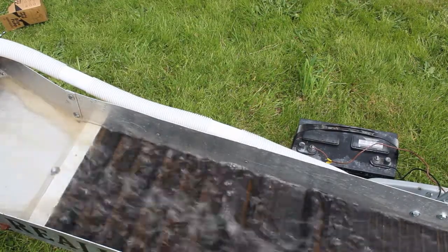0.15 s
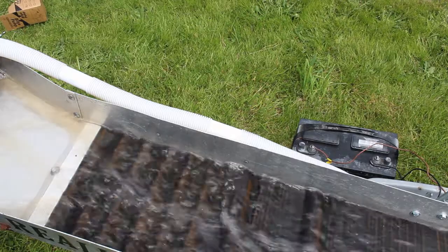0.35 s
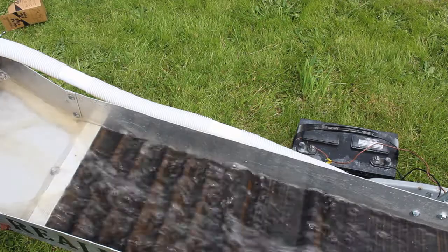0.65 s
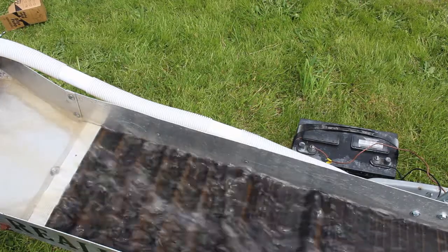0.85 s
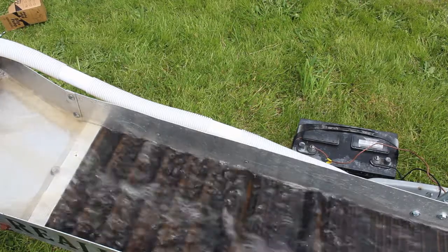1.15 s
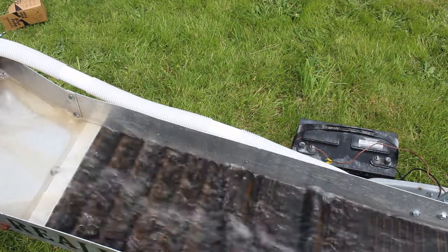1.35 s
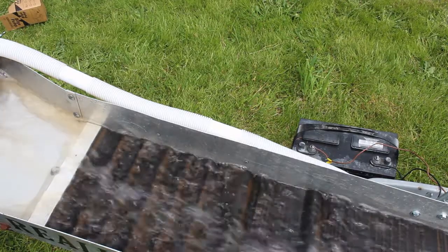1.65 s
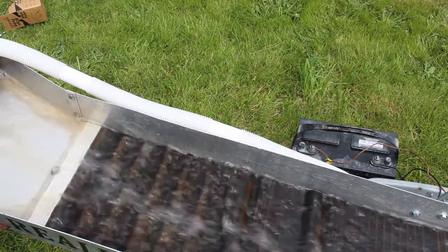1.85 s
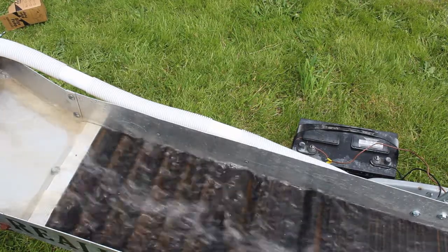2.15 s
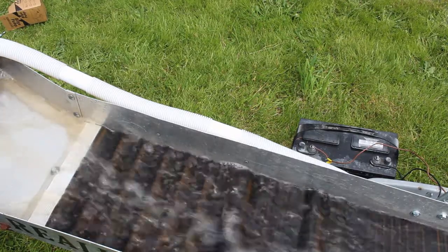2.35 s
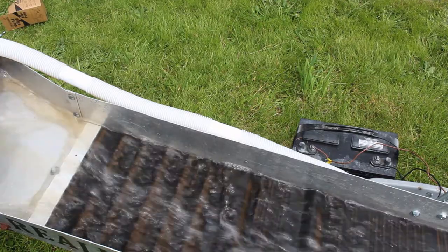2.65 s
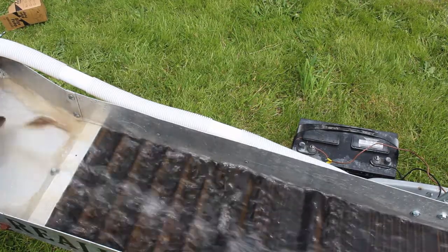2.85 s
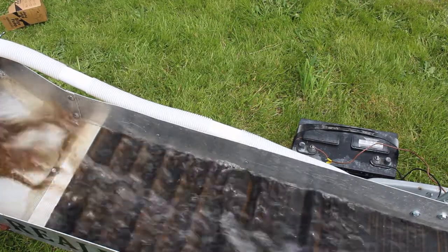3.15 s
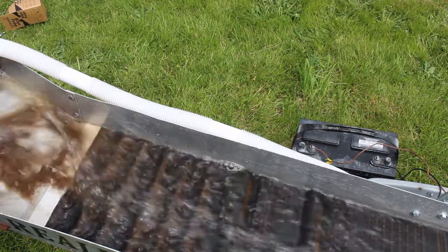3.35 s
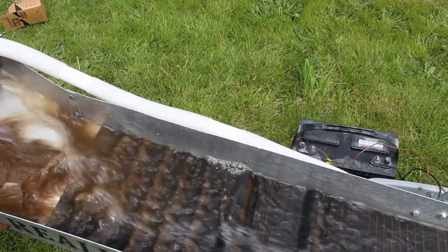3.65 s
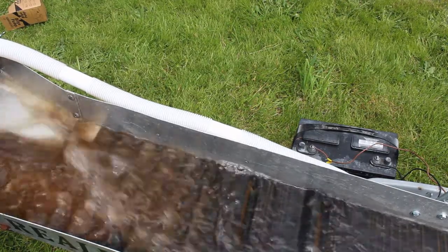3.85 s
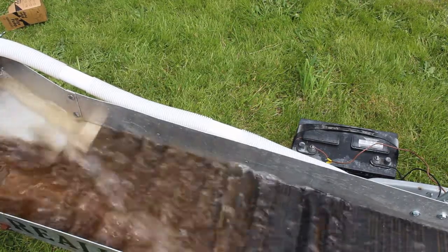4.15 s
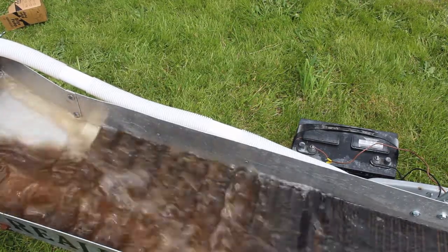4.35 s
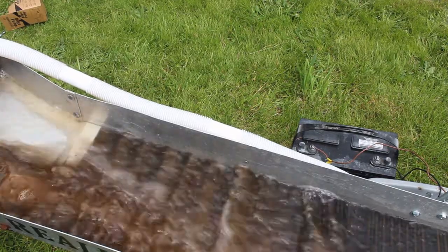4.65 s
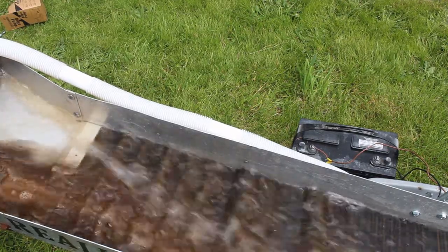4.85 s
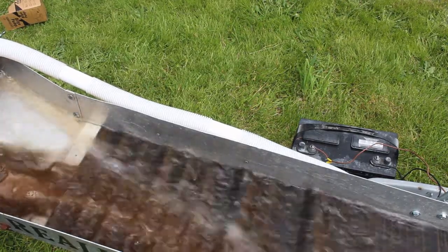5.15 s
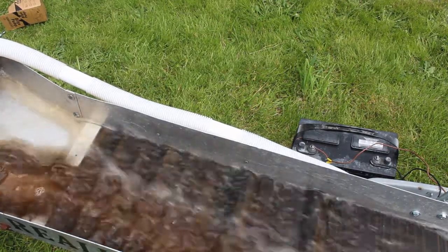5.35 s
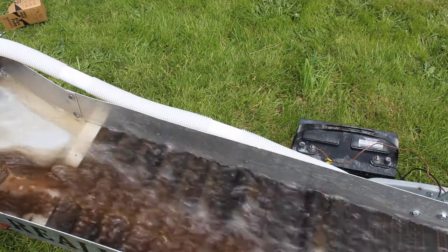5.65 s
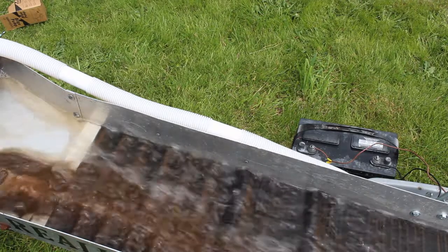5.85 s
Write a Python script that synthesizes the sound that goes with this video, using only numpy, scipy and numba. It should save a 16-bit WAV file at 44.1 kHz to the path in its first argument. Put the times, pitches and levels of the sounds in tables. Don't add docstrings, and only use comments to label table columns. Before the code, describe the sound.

Pumped water tumbles over riffles in a metal sluice box on a lawn, close to a small microphone. Bubbles gurgle, plop and fizz continuously. Faint gravelly shovel scrapes come in the first second; around three seconds dirt thuds onto the sheet metal with a gritty click, followed by a softer slump. Low engine hum lies underneath.

```python
import sys
import numpy as np
from scipy import signal
from scipy.fft import rfft, irfft
from scipy.io import wavfile
from scipy.ndimage import uniform_filter1d
from numba import njit

SR = 44100
rng = np.random.default_rng(int(sys.argv[2]) if len(sys.argv) > 2 else 0)


def materialize(psi):
    bounded = np.clip(np.atleast_2d(psi).T, -1, 1)
    quanta = np.round(bounded * 32767).astype(np.int16)
    wavfile.write(sys.argv[1], SR, quanta)


def magnitude_from_level(level_db):
    exponent = np.asarray(level_db, float) / 20
    return 10 ** exponent


N = 264600
TIME = np.arange(N) / SR

# time in seconds, fizz level in dB.
WATER_FLOW = [(0.0, -26.5), (0.1, -31), (0.22, -25.5), (0.7, -27.5), (1.04, -25), (1.2, -28.5),
              (2.1, -28.5), (2.2, -30.5), (2.4, -28.5), (2.97, -29.5), (3.06, -33.5), (3.18, -32.5),
              (3.3, -30), (3.75, -30), (4.9, -29), (5.3, -30), (5.5, -28.5), (6.0, -29)]
# start in seconds, length in seconds, level in dB, pitch in Hz.
AIR_SURGES = [(0.102, .066, -25, 926), (0.262, 0.105, -22.5, 1040), (0.407, 0.034, -19.5, 1170),
              (0.5, 0.094, -21, 1030), (0.628, 0.36, -20.5, 1003), (1.0, .13, -20, 1354),
              (1.331, 0.038, -21.5, 900), (1.454, 0.08, -21.5, 1144), (1.58, 0.1, -23.5, 955),
              (1.804, 0.046, -19, 1090), (1.892, 0.083, -24.5, 864), (2.121, 0.14, -22.5, 1020),
              (2.335, 0.034, -16.5, 1010), (2.487, 0.049, -18.5, 1070), (2.596, .04, -24, 1160),
              (2.711, 0.12, -24, 1140), (2.889, .03, -23.5, 990), (3.078, 0.067, -23.5, 894),
              (3.324, 0.14, -23, 1040), (3.638, 0.32, -22, 1104), (4.037, 0.21, -24.5, 1040),
              (4.325, 0.069, -24, 1078), (4.569, .06, -23.5, 1000), (4.76, 0.021, -19, 930),
              (4.84, 0.058, -25, 1010), (5.078, 0.2, -24, 950), (5.51, 0.036, -26, 1260),
              (5.632, 0.043, -19.5, 1140), (5.717, 0.043, -25, 900)]
# time in seconds, peak in dB, pitch in Hz.
LARGE_POCKETS = [(.152, -18, 834), (.3, -7.5, 1070), (.679, -4.5, 1056), (.715, -17, 1290),
                 (.769, -10, 880), (.792, -8, 1060), (.863, -9, 1000), (.893, -13, 975), (1.095, -14, 1270),
                 (1.52, -10.5, 1020), (1.691, -12.5, 860), (1.86, -13.5, 630), (1.899, -9.5, 900),
                 (1.971, -7.5, 825), (2.187, -9, 1000), (2.363, -12, 880), (2.51, -9, 1056),
                 (2.63, -10.5, 1185), (3.127, -14, 860), (2.496, -13, 1080), (4.055, -14, 1110),
                 (4.126, -11, 1004), (4.206, -13, 990), (4.501, -7.5, 1320), (4.769, -11, 910),
                 (5.113, -9.5, 907), (5.153, -10.5, 980), (5.254, -11.5, 1307), (5.627, -17, 1170),
                 (5.652, -16, 1160)]
# time in seconds, peak in dB, pitch in Hz.
POOL_PLOPS = [(.327, -7.5, 1490), (.914, -12, 1580), (1.027, -13, 1470), (1.17, -21, 1770),
              (1.294, -10.5, 1740), (1.461, -15, 1960), (1.517, -11, 1780), (1.585, -16.5, 1660),
              (1.701, -10, 1720), (1.755, -16.5, 2100), (1.869, -11.5, 1800), (2.088, -13, 2040),
              (2.125, -13.5, 1650), (2.404, -12, 1890), (3.515, -13.5, 1840), (3.845, -26, 1770),
              (4.167, -14, 2260), (4.399, -10.5, 1800), (4.435, -10.5, 1440), (4.706, -17, 1485),
              (4.789, -17.5, 1700), (5.26, -15, 1860), (5.332, -15.5, 1570), (5.629, -8.5, 1680),
              (5.813, -19, 2130), (5.826, -14.5, 1580), (5.851, -14.5, 1670)]
# time in seconds, peak in dB, pitch in Hz, decay in cycles.
HELD_POCKETS = [(.429, -14, 1154, 13.4), (1.099, -17, 1120, 12.5), (1.107, -12.5, 1550, 13),
                (2.34, -23, 917, 13.3), (2.401, -17.5, 1330, 8.4), (3.329, -15, 1130, 11),
                (3.652, -18.5, 1014, 10), (3.773, -21, 1349, 11), (5.216, -19, 1010, 10),
                (5.526, -17, 1250, 7.9)]
# time in seconds, peak in dB, pitch in Hz.
SHARP_SPITS = [(0.171, -16, 3670), (0.244, -12.5, 4100), (0.329, -17, 2550), (0.37, -14, 6630),
               (0.68, -13, 4330), (0.7166, -13.5, 6800), (0.9975, -11, 4000), (1.1712, -14.5, 6950),
               (1.496, -15.5, 4600), (1.52, -16, 6800), (1.7, -13, 5150), (1.9717, -15.5, 3200),
               (2.2477, -13.5, 6130), (2.72, -10, 4780), (2.916, -11, 4900), (2.9538, -11.5, 5650),
               (3.282, -16, 6910), (3.3923, -18.5, 3320), (3.644, -19, 4940), (3.783, -16.5, 3850),
               (4.022, -13, 4900), (4.167, -11, 6000), (4.8858, -16, 2800), (5.238, -16.5, 4370),
               (5.4127, -17, 5490), (5.534, -11.5, 5600), (5.538, -11, 3870), (5.5985, -14, 4690),
               (5.751, -9, 5820), (5.9734, -14.5, 3030)]
# pitch in Hz, level in dB per Hz.
BUBBLE_SPECTRUM = [(260, -41), (450, -20), (659, -7.5), (720, -12.5), (897, 1), (1220, -9), (1460, -5.5),
                   (2820, -12.5), (3170, -8.5), (5950, -9), (7870, -14.5), (9950, -34), (15000, -26)]
# frequency in Hz, level in dB per Hz.
SPRAY_SPECTRUM = [(15, -47), (25, -13), (91, -2.5), (238, 0), (347, 4.5), (442, -2), (1190, 1.5), (1360, 0),
                  (2670, 0), (3140, -5), (4690, -5), (7210, -9), (10200, -18.5), (13700, -30), (15300, -53)]
# start, peak and end in seconds, level in dB, centre of the grit noise in Hz.
SHOVEL_STROKES = [
    (.2, .36, 0.48, -26.5, 1500),
    (0.705, 0.818, 0.92, -24.5, 4100),
    (0.938, 1.04, 1.1, -23, 4460),
]
# pitch in Hz, width in Hz, level in dB, start and end in seconds.
BLADE_RINGS = [
    (720, 24, -26.5, .325, 0.406),
    (696, 37, -24.5, .415, 0.466),
]
# time in seconds, thud in dB, hardness in dB per octave,
# grit level in dB, grit decay in seconds.
DIRT_CLODS = [
    (2.9972, -23, -5.5, -13, 0.06),
    (3.0065, -32, 13, -14.5, 0.033),
    (3.0094, -16, -4.5, -23, 0.031),
    (3.0145, -28, 5, -31, 0.059),
]
# pitch in Hz, level in dB, time to fall 60 dB in seconds.
TRAY_MODES = [(170, -9, 0.065), (250, -12, 0.043), (347, 0, 0.037), (485, 1.5, 0.027), (667, 3, 0.047),
              (950, 5, 0.022), (1140, -7, .035), (1900, -20, .025), (2800, -15, .02)]
# time in seconds, peak in dB, pitch in Hz, decay in cycles.
DIRT_SLUMP = [(3.200, -25, 835, 16), (3.205, -23.5, 530, 7.5), (3.215, -18, 180, 1.5),
              (3.221, -14.5, 1090, 7.5), (3.223, -25, 620, 8.8), (3.233, -24.5, 533, 5.6),
              (3.229, -21, 2230, 13)]
# pitch in Hz, rms level in dB.
ENGINE_TONES = [(53.4, -53), (84, -49.5), (99, -45), (116, -52.5), (133.3, -48), (160, -49), (189, -54.5),
                (213.5, -51.5), (334, -55)]
# middle in seconds, level in dB, centre in Hz, half length in seconds.
WIND_PUFFS = [(.2, -71, 30, .08), (.95, -69, 32, 0.11), (2.0, -43, 32, .08), (0.39, -41, 225, 0.33),
              (5.3, -39, 156, 0.43), (5.35, -43, 93, 0.25), (0.4, -45, 150, .3), (4.72, -43, 150, 0.32)]

SURGE_EDGE_S, CALM_DB = 0.0084, -34.5


def level(x, db):
    return x * magnitude_from_level(db) / np.sqrt(np.mean(x ** 2))


def colour(table, hz):
    table = np.array(table)
    return np.interp(np.log(np.maximum(hz, 1)), np.log(table[:, 0]), table[:, 1])


def band(x, hz, width_hz):
    return signal.lfilter(*signal.iirpeak(hz, hz / width_hz, fs=SR), x)


def walk(rate):
    hold = int(SR / rate)
    steps = np.repeat(rng.standard_normal(N // hold + 1), hold)
    return 1.3 * uniform_filter1d(uniform_filter1d(steps, hold), hold)[:N]


def flutter(rate):
    quick = walk(rate)
    return quick - uniform_filter1d(quick, int(4 * SR / rate))


@njit
def ring(n, start, hz, cycles, glide, gain, rise):
    out = np.zeros(n)
    for k in range(len(start)):
        phase, step = 0., hz[k] / SR
        life = cycles[k] / step
        for i in range(min(int(4 * life), n - start[k])):
            envelope = gain[k] * np.exp(-i / life) * min(phase / rise[k], 1.)
            out[start[k] + i] += envelope * np.sin(2 * np.pi * phase)
            phase += min(step * (1 + glide[k] * min(i / life, 2.)), .45)
    return out


def tones(s, hz, cycles, glide, db, rise):
    flat = np.ones(len(s))
    start = (np.maximum(s, 0) * SR).astype(np.int64)
    return ring(N, start, hz * flat, cycles * flat, glide * flat, magnitude_from_level(db) * flat, rise * flat)


def water():
    fizz_db = np.interp(TIME, *np.transpose(WATER_FLOW))
    flow_change_db = fizz_db - fizz_db.mean()
    surge_db = surges()
    gurgle_db = -29 + 0.5 * flow_change_db + 0.26 * (surge_db - surge_db.mean())
    gurgle = bubbles(count=2200, lo_hz=648, hi_hz=2610, cycles=3.1, glide=0.158, scatter_db=3.5, bunch=.8)
    fizz = bubbles(count=8000, lo_hz=2169, hi_hz=14120, cycles=5.5, glide=0.0986, scatter_db=3.5, bunch=.9)
    crackle = bubbles(count=1500, lo_hz=2570, hi_hz=9470, cycles=1.0, glide=0.17, scatter_db=4.5, bunch=.9)
    froth = level(fizz, -3.0) + level(crackle, -8.5)
    rush = level(spray(1.09 * flow_change_db), -29.5)
    droplets = rng.standard_normal((2, N))

    s, db, hz, cycles = pockets(count=28)
    big = tones(s - 0.258 * cycles / hz, 0.88 * hz, 0.69 * cycles, 0.159, db + 3.5, 0.39 * cycles)
    big_drops = level(band(band(droplets[0], 930, 1650), 1550, 2200), -12)
    big = big + big_drops * splashes(s, db, 0.0027)

    s, db, hz = spits(fizz_db, count=110)
    small = tones(s - .0004, .95 * hz, 5.9 + 4 * rng.random(len(s)), 0.055, db + 4.0, 3.0)
    small_drops = level(band(band(droplets[1], 4200, 5500), 4900, 5500), -7.0)
    small = small + small_drops * splashes(s, db, 0.0027)
    return rush + level(gurgle, -1.7) * magnitude_from_level(gurgle_db) + froth * magnitude_from_level(fizz_db) + big + small


def surges():
    start, length, db, hz = np.transpose(AIR_SURGES)
    since_start = TIME - start[:, None]
    until_end = (start + length)[:, None] - TIME
    gate = np.clip(np.minimum(4 * since_start, until_end) / SURGE_EDGE_S + 1, 0, 1)
    return CALM_DB + np.max(gate * np.maximum(db - CALM_DB, 0)[:, None], axis=0)


def pockets(count):
    gap_s, fade_db, hush_s, hush_db = .014, -1, 0.0082, -7
    peak_db, scatter_db, pitch_spread = 5, 2.5, .16
    ring_s = 0.003705
    start, length, db, hz = np.transpose(AIR_SURGES)[:, :, None]
    chance = rng.standard_normal((3, len(AIR_SURGES), count))
    after = np.cumsum(gap_s * np.exp(.4 * chance[0]), axis=1)
    after = after - after[:, :1] + 0.004003
    db = db + peak_db + fade_db * after / length + scatter_db * chance[1]
    db = db - 40 * np.clip((after - length) / SURGE_EDGE_S, 0, 1)
    s = np.clip(start + after, 0, .999 * TIME[-1])
    until_large = np.transpose(LARGE_POCKETS)[0] - s[..., None]
    db = db + hush_db * np.max(np.exp(-(until_large / hush_s - 1) ** 2), axis=-1)
    hz = hz * np.exp(pitch_spread * np.tanh(chance[2]))
    train = [column.ravel() for column in (s, db, hz)]
    s, db, hz = np.hstack([train, np.transpose(LARGE_POCKETS), np.transpose(POOL_PLOPS)])
    return np.hstack([[s, db, hz, ring_s * hz], np.transpose(HELD_POCKETS)])


def spits(fizz_db, count):
    stray_db, scatter_db = 6.5, 5.5
    chance = rng.random((count, 3)).T
    s = chance[0] * TIME[-1]
    db = np.interp(s, TIME, fizz_db) + stray_db + scatter_db * (2 * chance[1] - 1)
    hz = 2600 * 2.5 ** chance[2]
    return np.hstack([[s, db, hz], np.transpose(SHARP_SPITS)])


def bubbles(count, lo_hz, hi_hz, cycles, glide, scatter_db, bunch):
    chance = rng.random((count, 5)).T
    density = np.cumsum(np.exp(bunch * flutter(60)))
    s = np.interp(chance[0], density / density[-1], TIME)
    hz = lo_hz * (hi_hz / lo_hz) ** chance[1]
    db = colour(BUBBLE_SPECTRUM, hz) + 20 * np.log10(hz) - scatter_db * np.log(chance[2] + 0.0065)
    return tones(s, hz, cycles * (0.54 + 0.94 * chance[3]), glide * 2 * chance[4], db, 1.2)


def spray(swell_db):
    freq = np.fft.rfftfreq(N, 1 / SR)
    octave = np.log2(np.maximum(freq, 1) / 20)
    shared = flutter(50)
    out = 0
    for centre in np.arange(0, 10, .5):
        overlap = np.sqrt(np.clip(1 - 2 * abs(octave - centre), 0, 1))
        shape = magnitude_from_level(colour(SPRAY_SPECTRUM, freq)) * overlap
        noise = irfft(rfft(rng.standard_normal(N)) * shape, N)
        flicker = np.clip((centre - 4) / 1.34, 0, 1) - 0.22 * max(centre - 8, 0)
        out = out + noise * magnitude_from_level(flicker * (1.4 * shared + 2.4 * flutter(35) + swell_db))
    return out


def splashes(s, db, decay):
    kicks = np.bincount((s * SR).astype(int), magnitude_from_level(db), N)
    return signal.lfilter([1], [1, -np.exp(-1 / (decay * SR))], kicks)


def trough(x, lag_s, db):
    lag = SR * lag_s * (1 + 0.313 * np.tanh(walk(25)))
    return x + magnitude_from_level(db) * np.interp(np.arange(N) - lag, np.arange(N), x)


def shovel():
    out = 0
    for start, peak, end, db, hz in SHOVEL_STROKES:
        grit = rng.standard_normal(N) * magnitude_from_level(1.8 * walk(300) + 0.66 * walk(40.2))
        scrape = level(band(band(grit, hz, 1.0 * hz), hz, 1.2 * hz), db)
        out = out + scrape * np.sin(np.interp(TIME, [start, peak, end], [0, np.pi / 2, 0]))
    for hz, width_hz, db, start, end in BLADE_RINGS:
        gate = np.interp(TIME, [start, start + 0.0059, end - .015, end], [0, 1, 1, 0])
        out = out + level(band(rng.standard_normal(N), hz, width_hz), db) * gate
    return out


def load():
    grit = rng.standard_normal(N) * magnitude_from_level(1.5 * walk(900))
    grit = level(band(band(grit, 3200, 7800), 3900, 7700), 0)
    s, db, hz, cycles = np.transpose(DIRT_SLUMP)
    slump = tones(s, hz, cycles, 0., db, 0.9)
    stone_click = tones([3.0103], 5600, 2.5, 0., -1.5, 0.34)
    out = slump + stone_click
    hz, mode_db, t60 = np.transpose(TRAY_MODES)
    cycles = t60 * hz / np.log(1000)
    for s, thud_db, hard_db, grit_db, decay in DIRT_CLODS:
        struck_db = thud_db + mode_db + hard_db * np.log2(hz / 700)
        out = out + tones(s + .0012 * rng.random(len(hz)), hz, cycles, 0., struck_db, 0.56)
        rattle = (TIME >= s) * 1000. ** (-np.maximum(TIME - s, 0) / decay)
        out = out + grit * magnitude_from_level(grit_db) * rattle
    return out


def hum():
    drift = 1 + 0.00403 * walk(.8)
    out = 0
    for hz, db in ENGINE_TONES:
        loudness = np.sqrt(2) * magnitude_from_level(db + 1.5 * walk(3.9))
        turns = np.cumsum(hz * drift) / SR + rng.random()
        out = out + loudness * np.sin(2 * np.pi * turns)
    return out


def breeze():
    out = 0
    for s, db, hz, length in WIND_PUFFS:
        rumble = level(band(rng.standard_normal(N), hz, 19), db)
        out = out + rumble * np.exp(-((TIME - s) / length) ** 2)
    return out


def scene():
    return (trough(water(), .002, -11.5) + shovel() + load() + hum() + breeze())[None]


def top_cut(x):
    return signal.sosfilt(signal.butter(12, 15440, fs=SR, output="sos"), x)


def record(dry):
    dull = signal.sosfilt(signal.butter(3, 11000, fs=SR, output="sos"), np.tanh(dry))
    thin = signal.sosfilt(signal.butter(2, 30, "high", fs=SR, output="sos"), dull)
    return top_cut(thin)


dry = scene()
out = record(dry)
materialize(out)
```